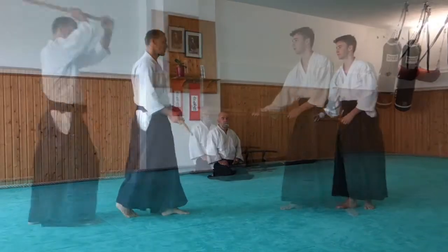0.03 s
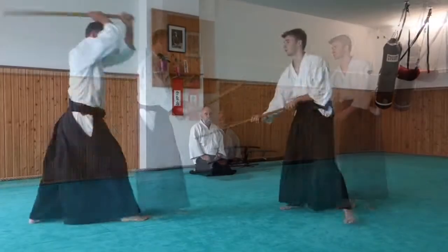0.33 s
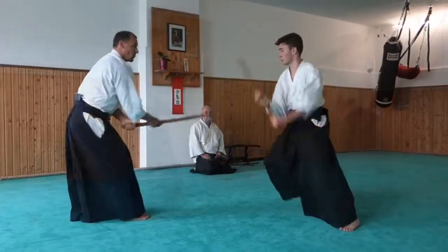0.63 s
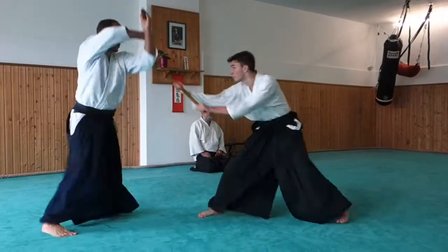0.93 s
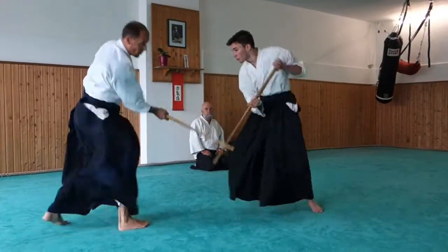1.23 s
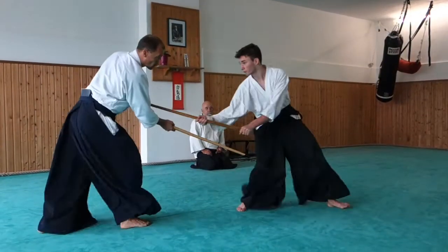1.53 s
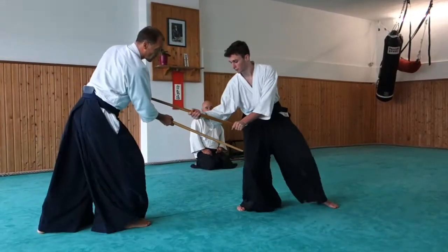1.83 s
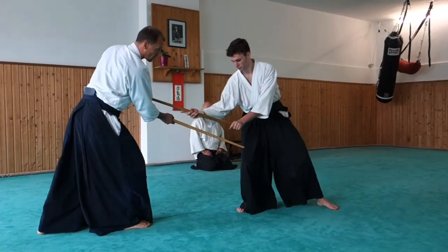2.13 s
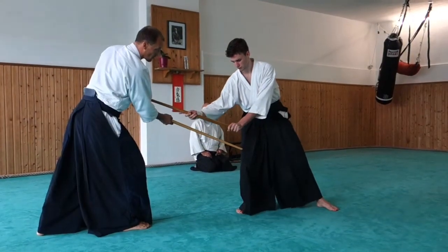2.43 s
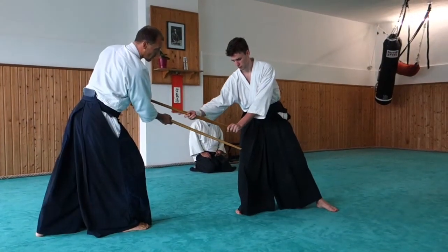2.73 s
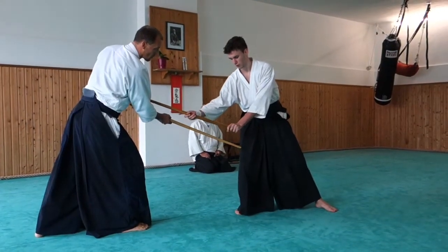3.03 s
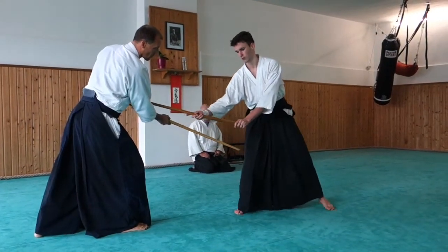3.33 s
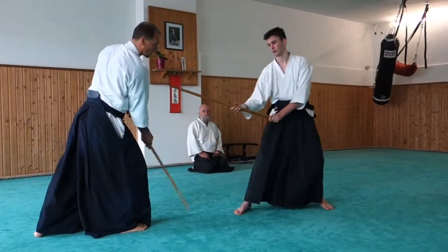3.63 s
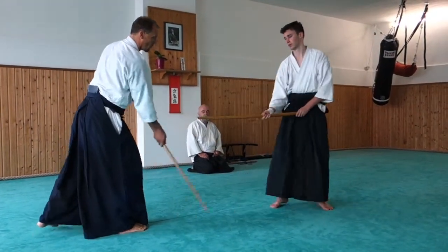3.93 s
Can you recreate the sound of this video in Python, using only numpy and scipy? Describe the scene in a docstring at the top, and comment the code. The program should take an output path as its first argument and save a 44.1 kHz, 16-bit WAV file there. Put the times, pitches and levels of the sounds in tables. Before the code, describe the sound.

Wooden swords crack together three times in an echoing hall, with bare feet thudding.

```python
"""Ventilation hums and jackets swish in a reverberant training hall, where two people spar on mats.
Bare feet stamp and shuffle, and the floor booms faintly under them. Wooden swords meet three times:
each blow cracks and sets both swords ringing, the first one sliding along the blade.
A gain control flattens each crack and recovers slowly."""
import sys
import numpy as np
from scipy import signal
from scipy.fft import rfft, irfft
from scipy.io import wavfile

SR = 44100
rng = np.random.default_rng(int(sys.argv[2]) if len(sys.argv) > 2 else 0)


def master_out(mix):
    """Clip the mix to full scale and print it as 16-bit PCM to the path in sys.argv[1]."""
    frames = np.transpose(np.atleast_2d(mix))
    ceiling = np.clip(frames, -1, 1)
    pcm = np.round(ceiling * 32767).astype(np.int16)
    wavfile.write(sys.argv[1], SR, pcm)


N = 176400
TIME = np.arange(N) / SR

# Stereo image of the hall's diffuse sound: frequency_hz, left_right_likeness
HALL_STEREO = [(200, 1), (500, 1), (1000, 0.84), (2000, .78), (3500, .63), (5000, 0.068), (7000, .13),
               (10000, 0.34)]


def from_db(db):
    """Decibels to gain."""
    return 10 ** (np.asarray(db) / 20)


def rms_one(x):
    """Scale to rms 1."""
    return x / np.sqrt(np.mean(x ** 2) + 1e-20)


def at_hz(points, hz):
    """Read a curve on a log-frequency axis."""
    frequencies, values = np.transpose(points)
    return np.interp(np.log(hz + 1e-9), np.log(frequencies), values)


def band(x, low_hz, high_hz):
    """Gentle band-pass."""
    bandpass = signal.butter(2, [low_hz, high_hz], "band", fs=SR, output="sos")
    return signal.sosfilt(bandpass, x + 1e-18)


def widen(pair, likeness):
    """Mix two unrelated noises into left and right with a given likeness."""
    size = pair.shape[1]
    alike = at_hz(likeness, np.fft.rfftfreq(size, 1 / SR))
    mid, side = rfft(pair) * np.sqrt([(1 + alike) / 2, (1 - alike) / 2])
    return irfft(np.array([mid + side, mid - side]), size)


def ventilation():
    """Room tone: a steady rush of air over a few low tones that waver slightly in level."""
    # Tones of the hum: pitch_hz, level_db (rms)
    hum_tones = [(76.7, -62.5), (114.9, -53), (268, -80.5), (308, -75)]
    # Colour of the moving air: frequency_hz, relative_level_db
    air_colour = [(20, -17.5), (45, -4.5), (80, -0.5), (170, 0), (320, 0.5), (600, -2), (1100, -7.5),
                  (2100, -7), (3300, -14), (6000, -13), (11000, -17.5)]
    # Stereo image of the air: frequency_hz, left_right_likeness
    air_stereo = [(150, 0.92), (450, .74), (1000, 0), (2000, 0.36), (5000, 0.025), (10000, 0.27)]
    hum = 0
    for pitch_hz, level_db in hum_tones:
        waver_db = rms_one(signal.resample(rng.standard_normal(24), N))
        tone = np.sqrt(2) * np.sin(2 * np.pi * (pitch_hz * TIME + rng.random()))
        hum = hum + from_db(level_db - waver_db) * tone
    colour = from_db(at_hz(air_colour, np.fft.rfftfreq(N, 1 / SR)))
    air = rms_one(irfft(rfft(rng.standard_normal((2, N))) * colour, N))
    return hum + from_db(-58) * widen(air, air_stereo)


def swishes():
    """Cloth, blades and soles: soft swells of friction noise, each around its own pitch."""
    # One swell per movement: peak_s, rise_s, fall_s, level_db, centre_hz, width_octaves
    movements = [(0.03, 0.1, 0.26, -58, 1700, 1.3), (0.18, 0.077, 0.21, -63, 370, 0.84),
                 (0.333, 0.023, 0.035, -52.5, 3500, 1.4), (0.5, 0.071, 0.12, -53, 2186, 1.8),
                 (0.527, .025, 0.012, -48.5, 560, 0.88), (0.892, 0.044, .06, -30.5, 450, 1.6),
                 (1.18, .04, 0.12, -37, 480, 1.6), (1.151, 0.09, .05, -52.5, 6000, 1.2),
                 (1.461, 0.073, 0.11, -37.5, 457, 0.54), (2.02, 0.067, 0.15, -61, 2080, 0.64),
                 (3.35, 0.087, 0.067, -61, 363, 0.81), (3.46, 0.31, 0.33, -61, 1610, 1.62),
                 (3.685, 0.011, 0.081, -50.5, 1540, 1.42), (3.9, 0.056, 0.12, -50.5, 4360, 0.81),
                 (3.85, 0.11, 0.24, -61.5, 440, 1.53)]
    out, octave = 0, np.log2(np.fft.rfftfreq(N, 1 / SR) + 1)
    friction = rfft(widen(rng.standard_normal((2, N)), HALL_STEREO))
    for peak_s, rise_s, fall_s, level_db, centre_hz, width_octaves in movements:
        colour = np.exp(-.5 * ((octave - np.log2(centre_hz)) / width_octaves) ** 2)
        swell = np.exp(-.5 * ((TIME - peak_s) / np.where(TIME < peak_s, rise_s, fall_s)) ** 2)
        out = out + from_db(level_db) * swell * rms_one(irfft(friction * colour, N))
    return out


def feet():
    """Bare feet land on the mats with dull thuds, and the floor booms faintly under each."""
    # Footfalls: start_s, relative_level_db
    footfalls = [(0.429, -22), (0.721, -16.5), (0.781, -17.5), (0.876, -6), (0.898, -3), (0.965, -13.5),
                 (1.123, -18.5), (1.259, -1), (1.398, -10), (1.485, 3), (3.628, -25)]
    decay_s = 0.022
    pressure = 0
    for start_s, level_db in footfalls:
        decay = np.exp(-np.clip((TIME - start_s) / decay_s, 0, 20))
        pressure = pressure + from_db(level_db) * (TIME >= start_s) * decay
    force = pressure * rng.standard_normal(N) * np.sqrt(2 / (decay_s * SR))
    impacts = hall(force, direct_db=-2.5)
    thud = from_db(20) * band(impacts, low_hz=151, high_hz=378)
    boom = from_db(5.5) * band(impacts, low_hz=35, high_hz=130)
    return thud + boom


def hall(force, direct_db):
    """An impact heard across the hall: direct sound, early reflections and a tail dying band by band."""
    # Reverb time: centre_hz, t60_s
    reverb_times = [(100, 0.78), (300, 0.67), (800, 0.88), (1800, 0.77), (3000, 0.68), (5500, 0.66),
                    (11000, .6)]
    # Early reflections off floor, ceiling and walls: delay_s, level_db
    reflections = [(.0018, -20), (.0069, -17), (.0113, -13), (.0315, -16.5)]
    size = len(force)
    diffuse = rfft(widen(rng.standard_normal((2, size)), HALL_STEREO))
    out = from_db(direct_db) * np.array([force, force])
    centres_hz, t60s = np.transpose(reverb_times)
    for t60_s, this_band in zip(t60s, np.eye(len(t60s))):
        decay = np.exp(-2 * np.log(1000) / (t60_s * SR))
        energy = signal.lfilter([1 - decay], [1, -decay], force ** 2 + 1e-18)
        crossover = np.interp(np.fft.rfftfreq(size, 1 / SR), centres_hz, this_band)
        out += np.sqrt(energy) * irfft(diffuse * crossover, size)
    for delay_s, level_db in reflections:
        for side in (0, 1):
            lag = int(delay_s * SR) + rng.integers(1, 3)
            out[side, lag:] += from_db(level_db) * force[:-lag]
    return out


def swords():
    """Each blow is one hard contact and a run of small slips: a crack, and the ring of both swords."""
    # Wood on wood, levels relative: start_s, first_sword_db, second_sword_db, crack_db,
    # contact_cutoff_hz, slide_s, slide_db, direct_db
    blows = [(0.535, -7, -22.5, -6.5, 6000, .18, 7.5, -14.5), (0.828, -12.5, -4.5, -4, 2200, .058, 0.5, -2),
             (1.2114, -2.5, 1, 4.5, 7000, .11, 0.5, -22.5)]
    # Bending modes of each sword: pitch_hz, relative_level_db, t60_s
    first_modes = [(614, -19, .05), (955, -10, .035), (1456, -5, .025), (1573, -4, .035), (1875, -1.5, .02),
                   (1972, -2.5, 0.058), (2539, 4.5, .02), (3022, 0, 0.11), (3500, 3.5, .02),
                   (4270, -3, 0.021), (4222, -39.5, 0.065), (5080, -11.5, .015), (6000, -11, 0.0079),
                   (6730, -19.5, 0.012)]
    second_modes = [(667, -15, .06), (960, -18, 0.022), (1336, -6, .08), (1669, -1.5, .05), (1744, -1, .09),
                    (2025, -0.5, 0.075), (2180, -1, .025), (2519, 0.5, .045), (2730, -8, 0.12),
                    (3003, 0, .025), (3630, -8.5, .022), (4130, -5, .035), (4540, -23.5, 0.036),
                    (5530, -13, 0.06)]
    ring_gain_db, crack_gain_db, slips_per_s = 19.5, 30, 500
    out, age = np.zeros((2, N)), TIME[:int(1.5 * SR)]
    for start_s, first_db, second_db, crack_db, cutoff_hz, slide_s, slide_db, direct_db in blows:
        slipping = (rng.random(len(age)) < slips_per_s / SR) & (age < slide_s)
        slips = slipping * rng.standard_normal(len(age))
        force = from_db(slide_db) * slips / (np.linalg.norm(slips) + 1e-9)
        force[0] = 1  # the hard contact
        soften = signal.butter(1, cutoff_hz, fs=SR)  # a softer contact has less treble
        first, second, contact = (signal.lfilter(*soften, hall(force, direct_db)) for _ in range(3))
        wood = from_db(first_db) * sword_ring(first, first_modes)
        wood += from_db(second_db) * sword_ring(second, second_modes)
        crack = from_db(crack_db + crack_gain_db) * band(contact, low_hz=1365, high_hz=5360)
        start = int(start_s * SR)
        out[:, start:start + len(age)] += from_db(ring_gain_db) * wood + crack
    return out


def sword_ring(force, modes):
    """Each bending mode rings as a damped sine, neighbours in opposite phase; level sets its energy."""
    out = 0
    for k, (pitch_hz, level_db, t60_s) in enumerate(modes):
        decay = np.exp(-np.log(1000) / (t60_s * SR))
        feedback = [1, -2 * decay * np.cos(2 * np.pi * pitch_hz / SR), decay ** 2]
        gain = (-1) ** k * from_db(level_db) * np.sqrt(1 - decay ** 2)
        out = out + gain * signal.lfilter([.5, 0, -.5], feedback, force + 1e-18)
    return out


def scene():
    """Swords, feet and cloth in the hall, over a bed of ventilation."""
    return swords() + feet() + swishes() + ventilation()


def release(db, db_per_s):
    """Catch each peak and let it sink at a steady rate."""
    return np.maximum.accumulate(db + db_per_s * TIME) - db_per_s * TIME


def record(dry):
    """Gain control ducks the cracks, lets go partly at once and creeps back; the top end is cut."""
    threshold_db, squeeze, attack_s, opening_cut_db = -14, 0.59, 0.0023, 5
    peak_db = 20 * np.log10(np.abs(dry).max(0) + 1e-9)
    wanted_cut_db = squeeze * np.maximum(peak_db - threshold_db, 0)
    fast_db = release(wanted_cut_db, db_per_s=69.5)
    slow_db = release(np.maximum(0.8 * wanted_cut_db, opening_cut_db * (TIME == 0)), db_per_s=3.3)
    smoothing = np.exp(-1 / (attack_s * SR))
    cut_db = signal.lfilter([1 - smoothing], [1, -smoothing], np.maximum(fast_db, slow_db))
    ducked = dry * from_db(-np.interp(TIME + 2 * attack_s, TIME, cut_db))  # looks ahead of each crack
    high_cut = signal.ellip(12, .1, 80, 11100, fs=SR, output="sos")  # steep, at 11.1 kHz
    return signal.sosfilt(high_cut, ducked)


dry = scene()
out = record(dry)
master_out(out)
```